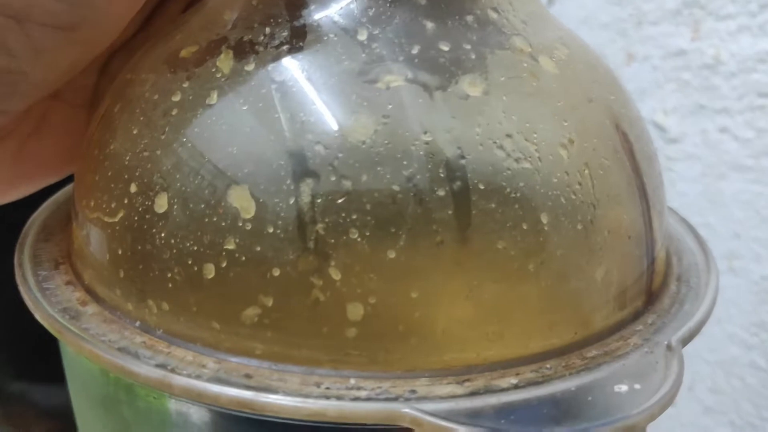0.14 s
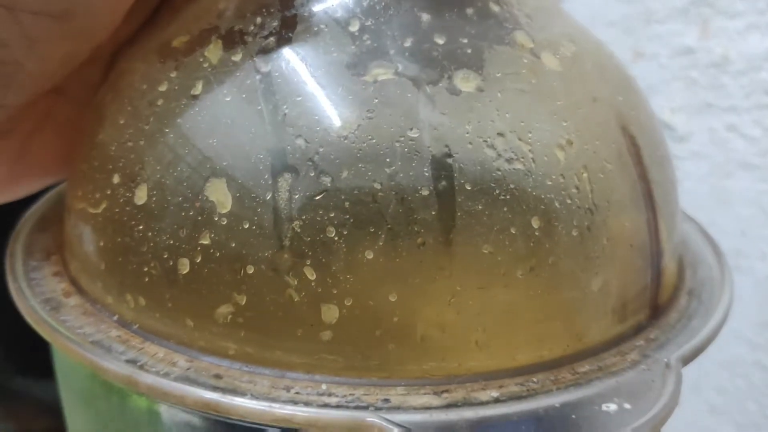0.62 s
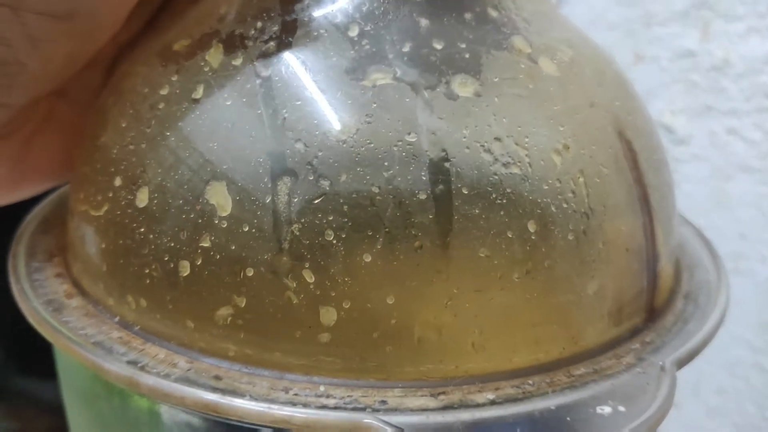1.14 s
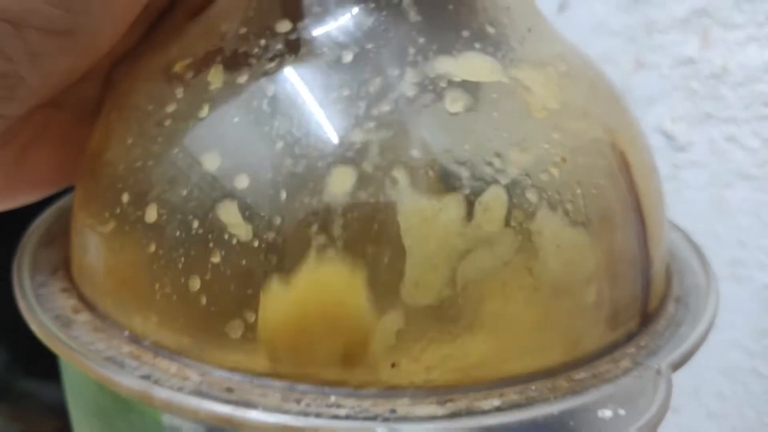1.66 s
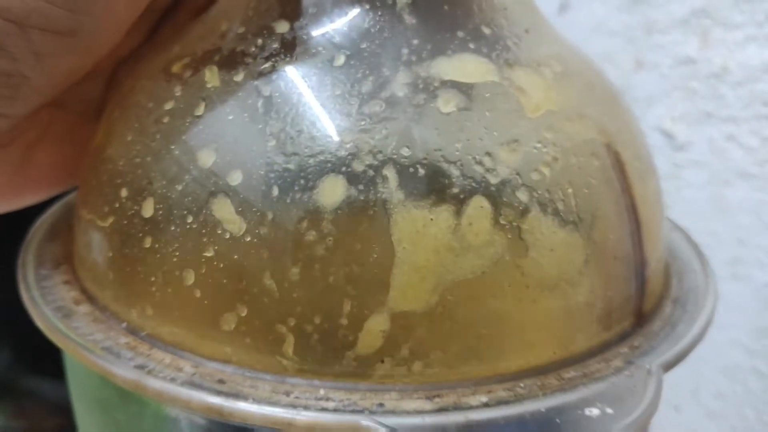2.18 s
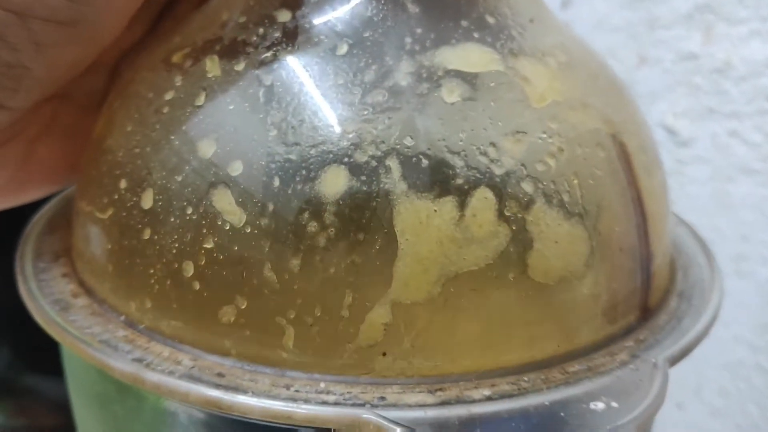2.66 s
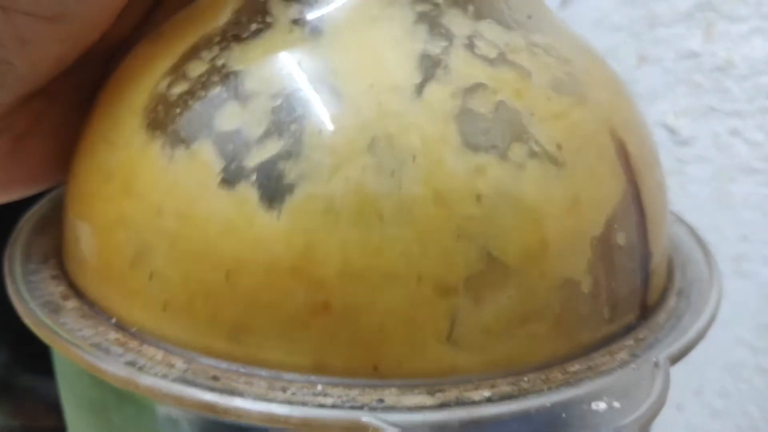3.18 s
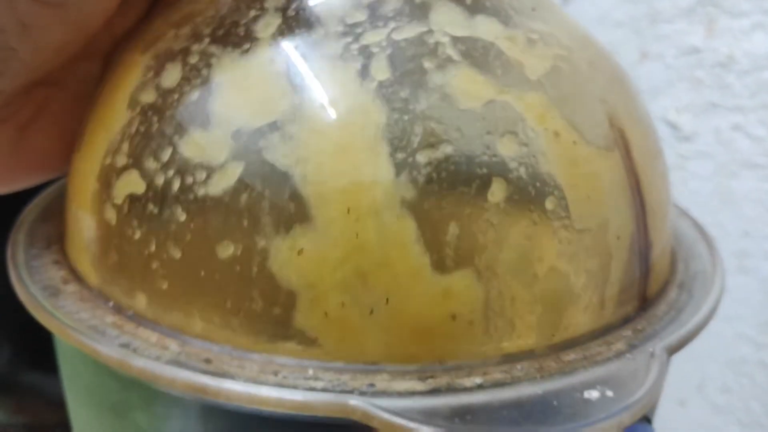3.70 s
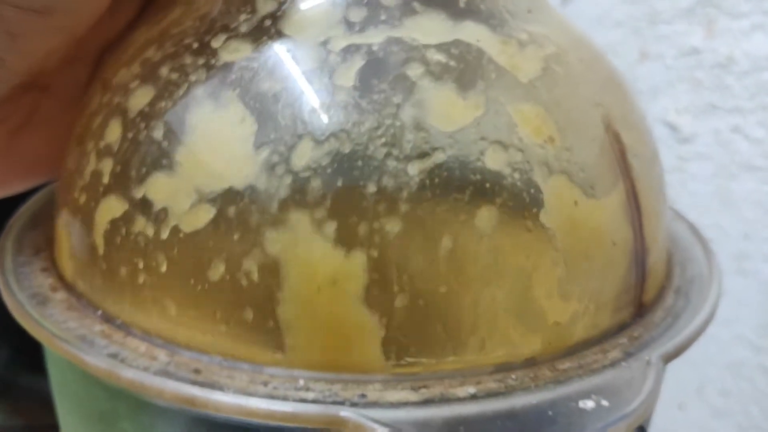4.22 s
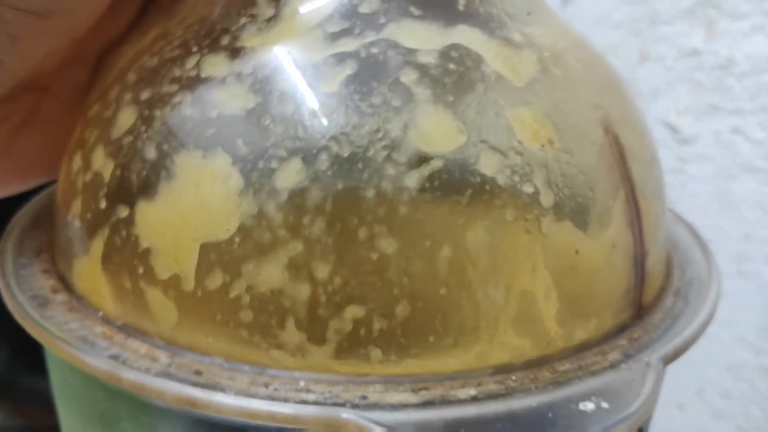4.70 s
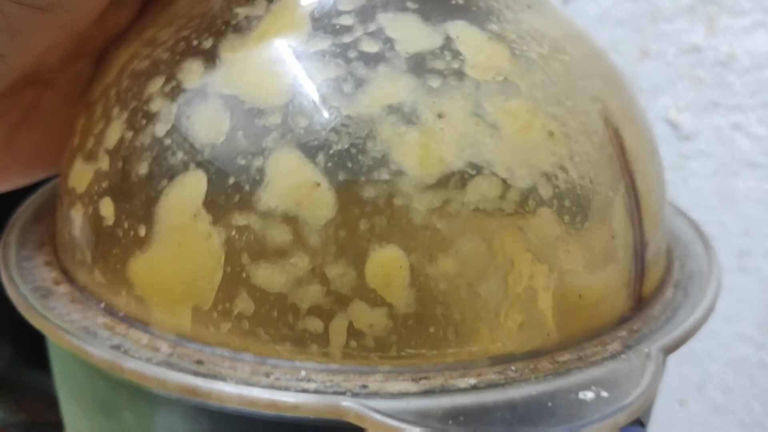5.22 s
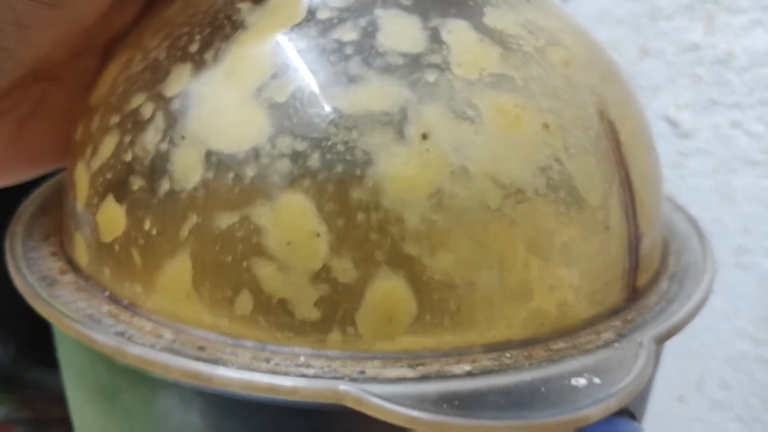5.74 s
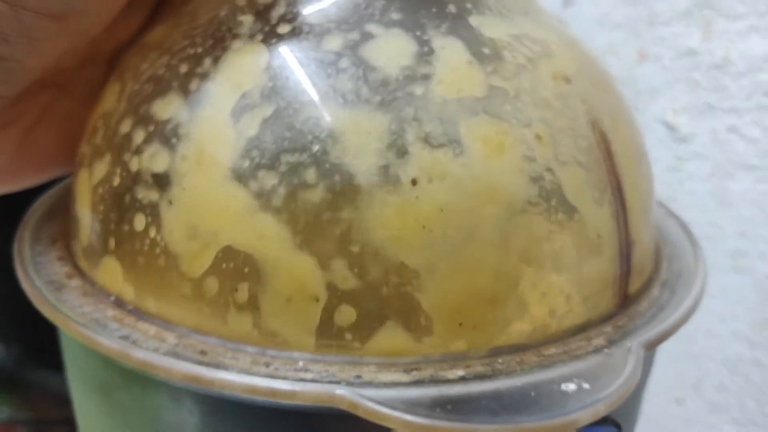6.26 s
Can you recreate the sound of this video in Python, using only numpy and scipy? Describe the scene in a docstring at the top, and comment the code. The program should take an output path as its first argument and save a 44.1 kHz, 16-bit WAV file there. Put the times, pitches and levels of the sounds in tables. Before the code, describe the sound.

Close recording of a mixer grinder in a small hard-walled kitchen. First only low hum, soft thuds, faint tings and light cup touches. A switch-on with chunky knocks brings a short rising whirr and wet slosh that slide down in pitch and fade. A moment later the motor spins up again and stays at full speed, a rough buzzing whine with dense splashing, hiss and little rattling bits until it cuts off.

```python
"""Dull knocks and small metal tings in a quiet, humming kitchen, then a small grinder with a steel jar of pulp.
It runs in one short burst that coasts down, then steadily. Its whine is sines at whole and half multiples
of the shaft speed. The pulp is noise grains pulsing with the blade; chunks ring the jar's resonances.
The small far sounds are dying noise coloured by the struck thing; feedback delays echo the grinder.
"""
import sys
import numpy as np
from scipy import signal
from scipy.fft import rfft, irfft, next_fast_len
from scipy.io import wavfile
from scipy.ndimage import uniform_filter1d

SR = 44100
rng = np.random.default_rng(int(sys.argv[2]) if len(sys.argv) > 2 else 0)


def undo_db(level):
    """Turn decibels back into plain size, where 20 dB means ten times bigger."""
    steps = np.asarray(level, float) / 20
    return 10 ** steps


def to_wav(s):
    """Save 16-bit WAV."""
    ch = np.atleast_2d(s).T  # columns
    pcm = np.round(np.clip(ch, -1, 1) * 32767)  # PCM
    wavfile.write(sys.argv[1], SR, pcm.astype(np.int16))


N = 280913

# pulp churning, one list per run: (time_s, churn_db, blade_hiss_over_churn_db)
CHURN_RUNS = [
    [(1.312, -33, -4), (1.332, -36, -21), (1.36, -21, -30), (1.42, -17, -19), (1.496, -12, -27),
     (1.908, -11.5, -26.5), (2.138, -22, -20), (2.326, -25.5, -25), (2.462, -29.5, -38), (2.52, -33.5, -46),
     (2.57, -43.5, -46)],
    [(2.85, -29.5, -5), (2.87, -24.5, -21), (2.92, -20, -20), (2.98, -14, -25), (3.13, -9.5, -29),
     (3.21, -13, -24.5), (3.63, -14.5, -15), (4.15, -14.5, -14.5), (5.2, -15, -15.5), (5.44, -13, -18.5),
     (5.95, -16, -13.5), (6.37, -13.5, -17.5)],
]


def rms_one(x):
    """Scale to an rms (average strength) of 1."""
    return x / np.sqrt(np.mean(x ** 2) + 1e-20)


def drift(rate_hz):
    """Slow random motion of spread 1: noise smoothed above rate_hz, made at every 40th sample."""
    r = np.exp(-80 * np.pi * rate_hz / SR)
    noise = rng.standard_normal(N // 40 + 2002)
    slow = signal.lfilter([1], [1, -2 * r, r * r], noise)[2000:]
    return np.interp(np.arange(N) / 40, np.arange(len(slow)), rms_one(slow))


def coloured(x, spectrum):
    """Give white noise a spectrum of (pitch_hz, level_db) points; rms 1."""
    hz, db = np.transpose(spectrum)
    grid = np.arange(N // 2 + 1) * SR / N + 1
    colour = undo_db(np.interp(np.log(grid), np.log(hz), db))
    return rms_one(irfft(rfft(x) * colour, N))


def split(x, edges_hz, overlap):
    """Bands between the edges; neighbours cross-fade so that they add up smoothly."""
    spectrum, grid = rfft(x), np.log(np.arange(N // 2 + 1) * SR / N + 1)
    above = [np.clip((grid - np.log(hz)) / overlap + .5, 0, 1) for hz in edges_hz]
    return [irfft(spectrum * (low - high), N) for low, high in zip(above, above[1:])]


def in_time(runs, edge_s=0.0066):
    """Columns of all runs joined in time, and a gate open during the runs, fading over edge_s around them."""
    t = np.arange(N) / SR
    s, *columns = np.transpose(np.vstack(runs))
    gate = 0
    for run in runs:
        inside_s = np.minimum(t - run[0][0], run[-1][0] - t)
        gate = gate + np.clip(inside_s / edge_s + 1, 0, 1)
    return [np.interp(t, s, c) for c in columns] + [gate]


def hum():
    """Steady kitchen hum: coloured stereo noise whose level wavers slowly."""
    # kitchen hum: (pitch_hz, relative_db_per_hz)
    hum_spectrum = [(40, -32), (90, -27), (125, -2), (180, -4), (240, -18), (700, -36.5), (900, -22),
                    (1000, -17.5), (1100, -41), (1800, -39), (15000, -54)]
    level_db = -67 + 2.5 * drift(8)
    return undo_db(level_db) * coloured(rng.standard_normal((2, N)), hum_spectrum)


def clatter(blows, modes):
    """A distant blow arrives as a crack and dying noise coloured by the modes of the struck thing."""
    onset_s = .0015   # each blow swells in over 1.5 ms instead of starting with a click
    out, t = np.zeros(N), np.arange(SR // 2) / SR
    grid = np.arange(SR // 4 + 1) * 2 + 1
    peaks = [undo_db(2 * db) / (1 + ((grid - hz) / (0.72 * width)) ** 4) for hz, width, db in modes]
    colour = np.sqrt(sum(peaks))
    for s, db, t60, tilt_db in blows:
        brightness = undo_db(tilt_db * np.log2(grid / 1000))
        noise = irfft(rfft(rng.standard_normal(len(t))) * colour * brightness)
        onset = np.sin(np.pi / 2 * np.minimum(t / onset_s, 1)) ** 2
        ring, crack = undo_db(db - 60 * t / t60), undo_db(db - 2.0 - 60 * t / 0.026)
        out[round(s * SR):][:len(t)] += rms_one(noise) * onset * (ring + crack)
    return out


def thuds():
    """Dull knocks on the counter, as dying noise in the counter's resonances."""
    # knocks: (start_s, level_db, fall_by_60_db_s, brightness_db_per_octave)
    thud_blows = [(.0, -54, 0.28, 5), (.283, -58, .15, -7), (.313, -50.5, 0.28, 0.3),
                  (.325, -51.5, 0.5, -0.5)]
    # counter resonances: (pitch_hz, width_hz, level_db)
    counter_modes = [(264, 40, 2), (460, 37, -3), (764, 52, -0.5), (935, 68, 2), (1480, 250, -4.5),
                     (1750, 109, -15), (2330, 250, -13), (2700, 163, -16), (3480, 250, -19),
                     (3980, 220, -16), (5430, 400, -22), (6500, 165, -27), (7400, 300, -30),
                     (8400, 340, -32)]
    return clatter(thud_blows, counter_modes)


def tings():
    """Small metal tings, as dying noise in narrow high resonances."""
    # tings: (start_s, level_db, fall_by_60_db_s, brightness_db_per_octave)
    ting_blows = [(.115, -66, .2, 6), (.495, -64, 0.18, 0), (.872, -63.5, 0.31, -4), (1.235, -67, .2, 4),
                  (2.812, -64, 0.31, 5)]
    # metal resonances: (pitch_hz, width_hz, level_db)
    metal_modes = [(4968, 25, 2), (5400, 36, -19), (7430, 25, -5), (9555, 25, -5), (10300, 60, -8),
                   (10400, 80, -13), (11300, 200, -20), (12000, 160, -18)]
    return clatter(ting_blows, metal_modes)


def clink():
    """One bright clink, as dying noise in a set of high resonances."""
    # clink: (start_s, level_db, fall_by_60_db_s, brightness_db_per_octave)
    clink_blows = [(.511, -54, .25, .01)]
    # clink resonances: (pitch_hz, width_hz, level_db)
    clink_modes = [(4000, 100, -26), (5000, 30, -10), (5370, 30, 3), (6030, 40, -17), (6660, 300, -15),
                   (7480, 50, -10), (8100, 500, -14), (9560, 40, -7), (10200, 500, -13), (11500, 800, -13),
                   (12700, 600, -15)]
    return clatter(clink_blows, clink_modes)


def taps():
    """A cup touched lightly, as dying noise in the cup's resonances."""
    # touches: (start_s, level_db, fall_by_60_db_s, brightness_db_per_octave)
    tap_blows = [(.914, -69, 0.16, 4.0), (1.112, -66, 0.21, -6)]
    # cup resonances: (pitch_hz, width_hz, level_db)
    cup_modes = [(500, 50, -7), (1400, 50, -6), (1680, 50, -8), (2295, 40, 3), (2402, 40, -2),
                 (2780, 80, -10), (3400, 50, -10)]
    return clatter(tap_blows, cup_modes)


def struck(blows, modes, spread_db, low_db):
    """Each blow rings every mode, a dying sine, with a strength of its own; low_db is for modes under 1500 Hz."""
    at, out = [round(row[0] * SR) for row in blows], np.zeros(N)
    luck = rng.normal(0, 1, (len(blows), len(modes)))
    for k, (hz, level_db, t60) in enumerate(modes):
        clicks = np.full(N, 1e-18)
        blow_db = np.array(blows)[:, 1] + level_db + spread_db * luck[:, k]
        clicks[at] = undo_db(blow_db + low_db * (hz < 1500))
        r, w = undo_db(-60 / (t60 * SR)), 2 * np.pi * hz / SR
        out += signal.lfilter([0, np.sin(w)], [1, -2 * r * np.cos(w), r * r], clicks)
    return out


def jar(blows, spread_db, low_db):
    """Blows through the broad resonances of jar and lid; the wider a resonance, the faster it dies."""
    # jar and lid resonances: (pitch_hz, width_hz, level_db)
    jar_modes = [(270, 60, -22), (520, 80, -12), (950, 70, -5), (1250, 80, -3), (2100, 300, -3),
                 (2500, 250, -4), (3400, 200, -1), (5000, 500, -5), (6300, 500, -4), (7800, 600, -8),
                 (11000, 900, -19)]
    modes = [(hz, db, np.log(1000) / (np.pi * width)) for hz, width, db in jar_modes]
    return struck(blows, modes, spread_db, low_db)


def knocks():
    """Chunks are soft and crumble: blows smear over a few milliseconds. Small bits tick at random."""
    # chunks and coupling knocking on the jar, the switch included: (start_s, level_db, low_modes_extra_db)
    knock_blows = [(1.31, -28, -30), (1.337, -22.5, 10), (1.3727, -14, -13), (1.3872, -20, -17),
                   (1.4135, -10, -9), (1.645, -14, -12), (2.156, -16, -4), (2.224, -26, -12),
                   (2.265, -29, -9), (2.3288, -17, 3), (2.4944, -39, 10), (2.5682, -44, 14),
                   (2.8425, -23, -24), (2.8619, -24, 16), (2.8741, -18, 14), (2.9098, -10.5, -3),
                   (2.949, -22, -8), (2.9766, -11, -3)]
    bits_per_s, bits_over_churn_db = 30, -6
    churn_db, _, gate = in_time(CHURN_RUNS)
    at = np.flatnonzero((rng.random(N) < bits_per_s / SR) & (gate == 1))
    luck_db = 2 * np.minimum(rng.exponential(1, N)[at], 3)
    bits = np.c_[at / SR, churn_db[at] + bits_over_churn_db + luck_db]
    blows = jar(knock_blows, spread_db=3, low_db=np.array(knock_blows)[:, 2])
    blows = blows + jar(bits, spread_db=4, low_db=-20)
    crumble = rng.standard_normal(400) * undo_db(-60 * np.arange(400) / SR / .005)
    # the knocks carry no deep bass
    blows = signal.sosfilt(signal.butter(4, 220, "high", fs=SR, output="sos"), blows)
    return signal.lfilter(crumble / np.linalg.norm(crumble), [1], blows)


def churn(turns):
    """Dense splash grains, swept once a turn by the blade; the hiss pulses hardest and comes in gusts."""
    # pulp in the jar: (pitch_hz, relative_db_per_hz)
    pulp_spectrum = [(40, -37.5), (100, -19), (250, -7), (500, -4), (1250, -1.5), (1600, -7.5),
                     (2100, -10.5), (3000, -11), (3400, -10), (3800, -11.5), (4600, -14), (7500, -19),
                     (9800, -32.5), (11200, -29.5), (14500, -40)]
    full_churn_db, rumble_over_churn_db = -14, -7.5
    rumble_holds = 0.51   # share of a fall in churn that the body rumble does not follow
    choppy_db = 0.1218   # the slosh deepens by this per dB that the churn falls
    late_s, rise_s = 0.0097, 0.008   # the body starts to shake just after the switch
    churn_db, hiss_db, gate = in_time(CHURN_RUNS)
    fall_db = full_churn_db - churn_db

    t = np.arange(N) / SR
    first_s, second_s = CHURN_RUNS[0][0][0], CHURN_RUNS[1][0][0]
    since = t - np.where(t < second_s, first_s, second_s)
    shake = undo_db(rumble_over_churn_db + rumble_holds * fall_db) * np.clip((since - late_s) / rise_s, 0, 1)

    grains = rng.standard_normal((2, N)) * undo_db(2.0 * np.minimum(rng.exponential(1, N), 4))
    sweep = np.cos(2 * np.pi * turns + 0.22 * drift(48))
    wobble = np.cos(np.pi * turns)   # every second turn
    # rumble lies below 1500 Hz, splash up to 9200 Hz, hiss above
    edges_hz = [20, 150, 300, 700, 1500, 2500, 4000, 6000, 9200, 11800, 16000]
    deep, *bands = split(coloured(grains, pulp_spectrum), edges_hz, overlap=0.46)
    slosh, gust = drift(14), drift(12)

    rumble = sum(undo_db(.8 * sweep + 1.4 * drift(15)) * b for b in bands[:3])
    rumble += deep * undo_db(1.4 * drift(15) - rumble_holds * fall_db)   # the deepest part follows the churn

    slosh_db = (1.2 + choppy_db * np.maximum(fall_db, 0)) * slosh
    splash = sum(undo_db(1.1 * sweep + 1.4 * wobble + slosh_db + 1.66 * drift(18.4)) * b for b in bands[3:7])

    hiss = 0
    for depth_db, band in zip([4.5, 1.5], bands[7:]):
        hiss = hiss + undo_db(depth_db * sweep + 0.57 * wobble + 1.0 * gust + 4.2 * drift(34)) * band

    mix = shake * rms_one(rumble) + rms_one(splash) + undo_db(hiss_db) * rms_one(hiss)
    return mix * undo_db(churn_db) * gate


def whine(turns, speed, whine_db):
    """Sines locked to the shaft, unsteady under load; half orders, a wobble every second turn, come and go."""
    # base level of each half multiple (order) of the shaft speed, from 0.5 up to 13: (level_db)
    order_db = [-18.5, -18, -16, -11, -18.5, -10, -14, -14, -17, -6.5, -10, -1.5, -9.5, -7.5, -20.5, -14,
                -21, -15, -13, -15.5, -18, -19.5, -25, -18.5, -27, -19]
    full_speed = 203   # revolutions per s
    low_orders_stay_db = 11   # dB per octave of lost speed and octave below order 6
    base_cut_hz, base_cut_db = 140, 18   # the small base radiates little below this: dB per octave
    wander_db = 1.5   # each order swells and sinks slowly on its own
    flutter_slowed_db = 12   # flutter in dB per octave of lost speed, limited to 4 dB below
    rough_full, rough_slowed = .42, 1.5   # phase jitter (rad), and more per octave below full speed
    out, slowed = 0, np.maximum(np.log2(full_speed / speed), 0)
    for k, db in enumerate(order_db):
        multiple = (k + 1) / 2
        octaves_low = max(0, np.log2(6 / max(multiple, 2))) * (multiple >= 1)
        level_db = whine_db + db + low_orders_stay_db * slowed * octaves_low
        level_db = level_db - base_cut_db * np.maximum(np.log2(base_cut_hz / (multiple * speed)), 0)
        level_db = level_db + wander_db * drift(3.0)
        level_db = level_db + np.minimum(flutter_slowed_db * slowed, 4) * (drift(10) - .6)
        # whole orders waver a little, half orders much more
        level_db = level_db + (0.92 * drift(14) if k % 2 else 3.5 * drift(5) - 4)
        jitter = (rough_full + rough_slowed * slowed) * drift(14)
        phase = 2 * np.pi * multiple * turns + jitter + .2 * (multiple - 6) ** 2
        out = out + undo_db(level_db) * np.cos(phase)
    return np.sqrt(2) * out


def buzz(turns, whine_db):
    """The blade slaps the pulp against the jar wall once a turn."""
    slap_over_whine_db = -6
    at = np.flatnonzero(np.diff(np.floor(turns + .03 * drift(30))) > 0)
    slaps = np.c_[at / SR, whine_db[at] + slap_over_whine_db]
    return jar(slaps, spread_db=5.5, low_db=-18)


def motor():
    """Whine and blade slap driven by one shaft; also returns the turns made so far."""
    # shaft in each run, spinning up, holding, coasting: (time_s, speed_revolutions_per_s)
    shaft_runs = [
        [(1.4, 131.9), (1.45, 143.7), (1.506, 171.4), (1.572, 187.7), (1.61, 192), (1.682, 200.1),
         (1.782, 201.2), (1.842, 181.6), (1.898, 164), (1.998, 140.4), (2.3, 89.8)],
        [(2.95, 130), (3.05, 179.4), (3.13, 193.6), (3.2, 202.6), (3.33, 208.9), (3.46, 205.6), (3.75, 203.1),
         (4.06, 207.5), (4.34, 205.4), (4.65, 202.8), (4.86, 201.8), (5.58, 202.5), (5.65, 203.7),
         (5.83, 200.7), (6.37, 202.5)],
    ]
    # loudness of the whine: (time_s, level_db)
    whine_level = [(1.4, -28), (1.5, -24.5), (1.6, -16.5), (1.8, -15), (1.87, -18.5), (2.0, -27.5),
                   (2.3, -42), (2.95, -29), (3.05, -21.5), (3.13, -16.5), (3.2, -14), (3.5, -15),
                   (4.5, -15), (5.5, -14), (6.37, -14.5)]
    speed, gate = in_time(shaft_runs, edge_s=0.088)
    whine_db = in_time([whine_level])[0]
    turns = np.cumsum(speed) / SR
    return (whine(turns, speed, whine_db) + buzz(turns, whine_db)) * gate, turns


def kitchen(x):
    """Echoes of hard walls: eight feedback delays a side, duller on every round."""
    t60_s = 0.5   # time to fall by 60 dB in the deep bass
    wall_cut_hz = 7900   # corner of the wall filter, softened by a power below
    size = next_fast_len(N + SR)
    w = 2 * np.pi * np.arange(size // 2 + 1) / size
    dull = np.exp(-2 * np.pi * wall_cut_hz / SR)
    wall = (1 - dull) / (1 - dull * np.exp(-1j * w))
    tail = np.zeros((2, len(w)), complex)
    lags = (rng.uniform(.011, .033, 16) * SR).astype(int)
    for k, lag in enumerate(lags):
        loop = undo_db(-60 * lag / SR / t60_s) * wall ** 0.37 * np.exp(-1j * w * lag)
        tail[k % 2] += (-1) ** (k // 2) * loop / (1 - loop)
    return irfft(rfft(x, size) * tail, size)[:, :N]


def scene():
    """Grinder close by, small sounds further off in the same kitchen."""
    shaft_sound, turns = motor()
    pulp, blows = churn(turns), knocks()
    far = thuds() + clink()
    far += tings() + taps()
    background = hum()
    near = shaft_sound + blows + np.sqrt(2) * pulp
    return near + far + undo_db(-13.5) * kitchen(near[0]) + background


def roll_off(x):
    """The treble ends steeply here."""
    return signal.sosfilt(signal.butter(12, 15280, fs=SR, output="sos"), x)


def record(dry):
    """Gain control evens the loud run; bass is cut, peaks rounded, and only patches of treble are wide."""
    # treble flickering between narrow and wide: (band_edge_hz, share_of_time_wide)
    wide_bands = [(3900, .05), (4600, .15), (5500, .4), (6500, .6), (7600, .6), (8800, .55), (10000, .65),
                  (11200, .7), (12400, .7), (13400, .5), (14300, 0)]
    low_cut_hz, top_cut_hz = 60, 14330
    level_db = 10 * np.log10(uniform_filter1d(np.mean(dry ** 2, axis=0), size=2048) + 1e-12)
    # gain control halves, in dB, any rise above the threshold
    both = dry * undo_db(-.5 * np.maximum(level_db + 6.5, 0))
    mid, side = (both[0] + both[1]) / 2, (both[0] - both[1]) / 2
    mid = .88 * np.tanh(mid / .88)   # rounds the peaks
    mid = signal.sosfilt(signal.butter(2, low_cut_hz, "high", fs=SR, output="sos"), mid)

    wide = 0
    patches = split(side, [row[0] for row in wide_bands], overlap=.01)
    for (_, share), patch in zip(wide_bands, patches):
        flicker = drift(9)
        is_wide = 1. * (flicker > np.quantile(flicker, 1 - share))
        wide = wide + uniform_filter1d(is_wide, size=512) * patch
    both = np.array([mid + undo_db(-3.3) * wide, mid - undo_db(-3.3) * wide])
    finished = split(both, [1, top_cut_hz], overlap=.01)[0]
    return roll_off(finished)


dry = scene()
out = record(dry)
to_wav(out)
```